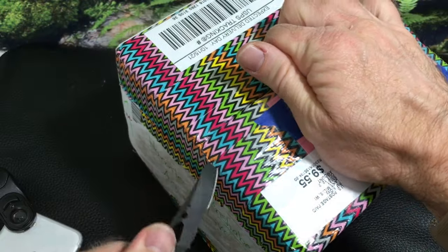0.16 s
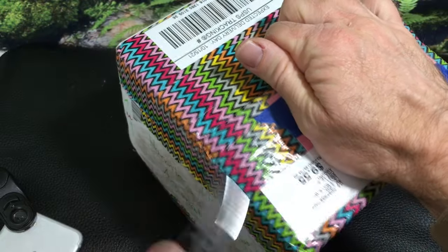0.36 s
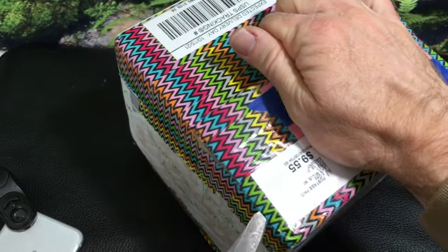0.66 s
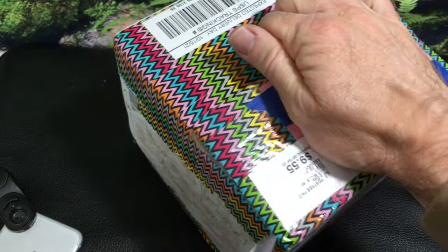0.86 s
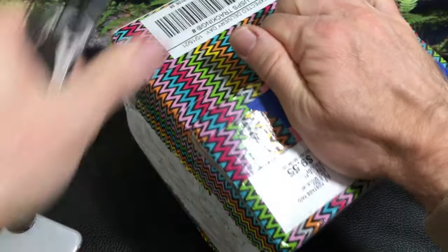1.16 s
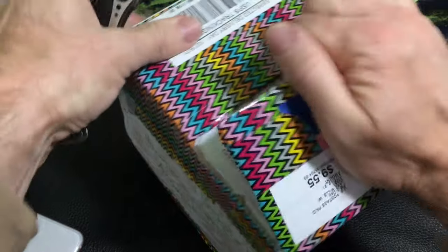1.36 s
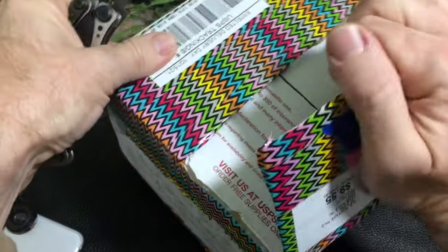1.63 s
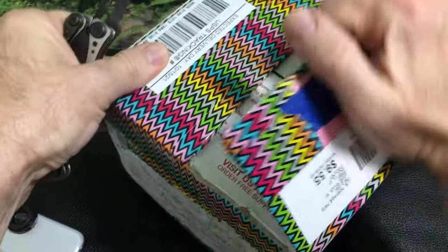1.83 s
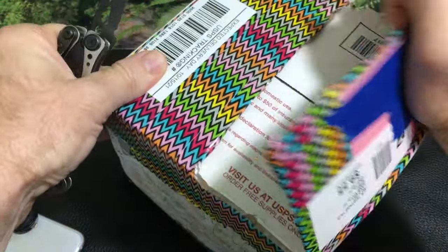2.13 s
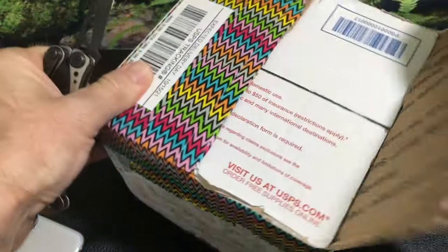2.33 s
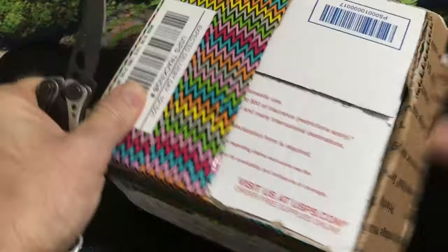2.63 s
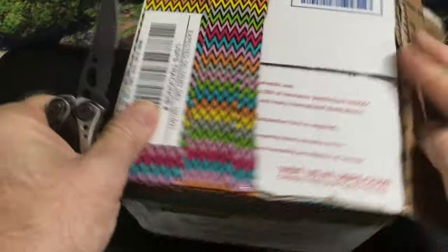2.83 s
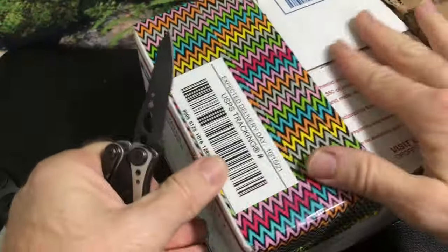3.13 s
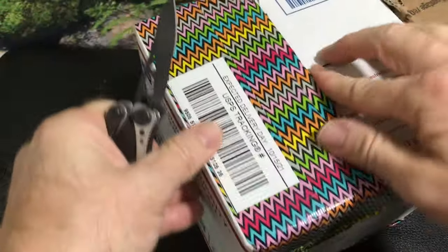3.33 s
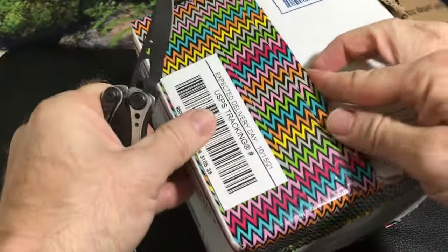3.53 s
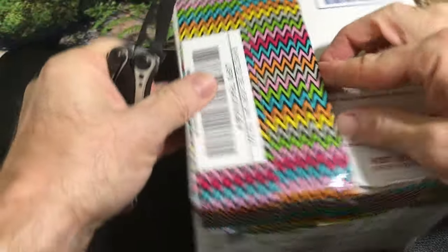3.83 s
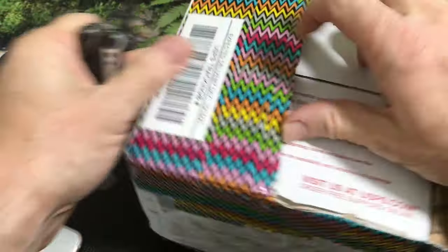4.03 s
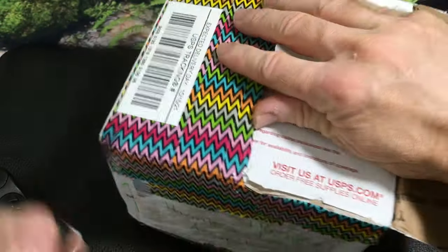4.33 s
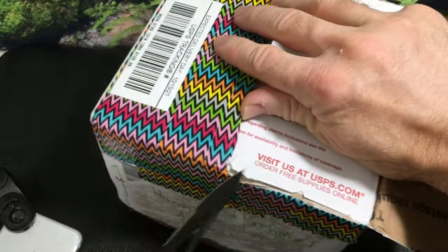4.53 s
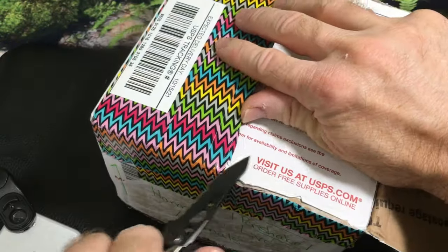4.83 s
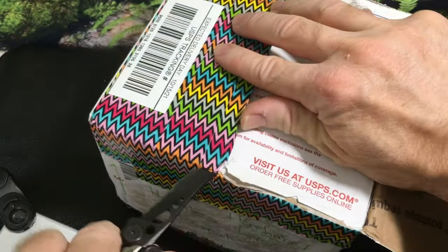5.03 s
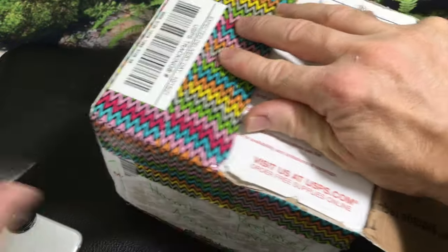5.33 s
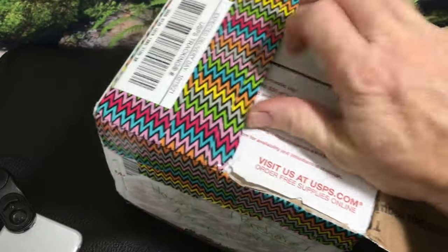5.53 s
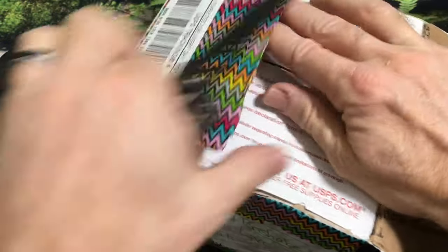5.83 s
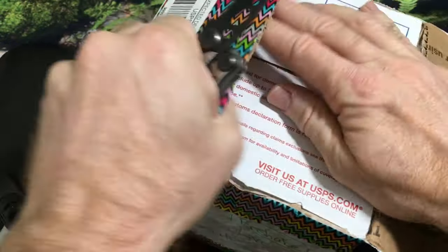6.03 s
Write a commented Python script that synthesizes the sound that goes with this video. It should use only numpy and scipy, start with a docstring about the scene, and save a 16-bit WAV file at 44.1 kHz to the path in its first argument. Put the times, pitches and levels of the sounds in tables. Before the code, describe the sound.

Short gritty cuts and hollow taps come first, ending in sharper hissing slits. After a small pause, tape snaps and peels, then rips hard with crackling and boxy resonance. Palms brush over card, light knocks cluster, a couple of crisp cuts with a strong knock follow, and rubbing closes it. Dry, near microphone, small furnished room, low hum.

```python
"""A small blade is heard first, slitting the thick tape on a cardboard box, close by in a quiet room with a low hum.
The flap is pulled up: the tape peels, snaps thread by thread and rips. Hands slide over the box, turn it and bump it,
and the blade cuts again. Cuts, slides and rips are trains of random tiny slips, filtered into hiss and box drone;
snaps and bumps are decaying noise bursts with a flexing panel that rings the box modes."""
import sys
import numpy as np
from scipy import signal
from scipy.fft import rfft, irfft, next_fast_len
from scipy.io import wavfile
from scipy.ndimage import uniform_filter1d, map_coordinates

SR = 44100
rng = np.random.default_rng(int(sys.argv[2]) if len(sys.argv) > 2 else 0)


def to_wav(s):
    """Save 16-bit WAV."""
    ch = np.atleast_2d(s).T  # columns
    pcm = np.round(np.clip(ch, -1, 1) * 32767)  # PCM
    wavfile.write(sys.argv[1], SR, pcm.astype(np.int16))


N = 272270  # length of the scene [samples]


def amp(db):
    """Level to amplitude: 20 dB is a factor of ten."""
    return 10 ** (np.asarray(db) / 20)


def unit(x):
    """Normalisation by effective value: scale to rms 1."""
    return x / np.sqrt(np.mean(x ** 2) + 1e-20)


def along(points, hz):
    """Logarithmic frequency scale: (frequency [Hz], value) points interpolated along it."""
    f, values = np.transpose(points)
    return np.interp(np.log(hz + 1), np.log(f), values)


def wobble(rate):
    """Slow random modulation: a smooth curve through rate random knots a second."""
    knots = rng.standard_normal(int(N * rate / SR) + 4)
    return map_coordinates(knots, [np.arange(N) * rate / SR])


def colour(x, spectrum):
    """Minimum-phase filtering: the folded cepstrum gives a causal response of this shape; the result has rms 1."""
    m = 2 * next_fast_len(len(x))
    log_gain = np.log(amp(along(spectrum, np.fft.rfftfreq(m, 1 / SR))))
    cepstrum = irfft(log_gain)
    cepstrum[1:m // 2] *= 2
    cepstrum[m // 2 + 1:] = 0
    response = np.exp(rfft(cepstrum))
    return unit(irfft(rfft(x, m) * response)[:len(x)])


def grains(rate, spread_db):
    """Stick-slip friction: tiny slips at random moments, rate a second, of widely varying size."""
    chance, size = rng.random(N), rng.standard_normal(N)
    sign = rng.choice([-1, 1], N)
    return unit((chance < rate / SR) * sign * amp(spread_db * np.clip(size, -2, 2)))


def shifting(x, depth_db):
    """Drifting resonance: the card's fine resonances move as the contact point moves over it."""
    z = signal.stft(x, nperseg=512)[2]
    field = rng.standard_normal(z.shape)
    field = uniform_filter1d(field, size=4, axis=0)  # smooth in frequency
    field = uniform_filter1d(field, size=11, axis=1)  # smooth in time
    return unit(signal.istft(z * amp(depth_db * unit(field)), nperseg=512)[1][:N])


# level reached one attack time before a stroke and one release time after it [dB]
REST_DB = -79


def strokes(rows, attack_s, release_s):
    """Exponential growth and decay: straight dB slopes around a steady swell; a gain for the first and each added layer."""
    t, power = np.arange(N) / SR, 0
    for s, length, db, swell_db, *layers_db in rows:
        held_db = db + swell_db * np.clip((t - s) / length, 0, 1)
        before = np.maximum(s - t, 0) / attack_s
        after = np.maximum(t - s - length, 0) / release_s
        gain = amp(held_db + (REST_DB - held_db) * np.minimum(before + after, 10))
        power = power + np.outer(amp([0, *layers_db]), gain) ** 2  # overlapping strokes add in power
    return np.sqrt(power)


# strokes of the blade: (start [s], length [s], edge hiss level [dB], swell over the stroke [dB],
# rasp relative to hiss [dB], box drone relative to hiss [dB]), before the mix in blade()
CUT_STROKES = [(0.0, 0.026, -58.5, 0, -0.5, 13.5), (0.072, 0.052, -57, 7.5, 0.5, 11),
               (0.145, 0.051, -55.5, -2.5, 2, 12.5), (0.222, 0.087, -54, -4.5, 2, 14),
               (0.354, 0.04, -44, 13, 0.5, 6), (0.566, 0.071, -51.5, 18, -0.5, 9),
               (0.725, 0.032, -40, 1, -5, 2.5), (0.868, .045, -45.5, -6.5, -5, 2.5),
               (0.943, .005, -52, 2, -7, 0), (4.72, 0.02, -44.5, -3, -8.5, -5),
               (4.862, 0.18, -49.5, 0, -4.5, 3.5), (5.041, 0.0086, -39.5, 0, -3.5, 8),
               (5.091, 0.087, -32, 3.5, -6, 3), (5.282, 0.014, -45, 0.5, -4.5, 11),
               (5.331, 0.016, -31, 0.5, -4.5, 5)]
# spectra of the parting tape, the rasping card and the box under the blade: (frequency [Hz], level [dB])
TAPE_HISS_SPECTRUM = [(2000, -20.5), (3600, -5.5), (5200, 1), (7200, -1), (11500, -1.5), (13500, -12.5),
                      (16000, -23)]
CARD_RASP_SPECTRUM = [(600, -21.5), (950, 0.5), (1220, 6.5), (1350, 5), (1480, 2), (2000, -2), (2700, -3),
                      (3600, -3), (5000, -2.5), (8000, -23)]
BLADE_DRONE_SPECTRUM = [(70, -25), (115, -14.5), (190, -18.5), (290, -12.5), (410, -6.5), (480, -0.5),
                        (525, 2), (590, -5.5), (700, -10), (950, -22), (2000, -54)]
CUT_ATTACK_S, CUT_RELEASE_S = 0.03, 0.05  # the edge bites, then runs out


def blade():
    """Fracture noise: the edge parts thousands of fibres a second; tape hisses, card rasps and the box drones."""
    hiss, rasp, drone = strokes(CUT_STROKES, CUT_ATTACK_S, CUT_RELEASE_S)
    fibres = grains(rate=9000, spread_db=3.0) * amp(1.56 * wobble(130))
    tape = hiss * shifting(colour(fibres, TAPE_HISS_SPECTRUM), depth_db=3.5)
    card = amp(1) * rasp * shifting(colour(fibres, CARD_RASP_SPECTRUM), depth_db=2.5)
    box = amp(0.5) * drone * colour(fibres, BLADE_DRONE_SPECTRUM)
    return tape + card + box


# reverberation of the room: (frequency [Hz], decay time to -60 dB [s])
ROOM_DECAY = [(150, 0.34), (600, 0.19), (3000, 0.25), (12000, 0.11)]


def room(x):
    """Reverberation: a small furnished room returns a short noise-like tail, longest in the bass."""
    hz, t, z = signal.stft(rng.standard_normal(SR // 3), SR, nperseg=256)
    decay = amp(-60 * t / along(ROOM_DECAY, hz)[:, None])
    tail = signal.istft(z * decay, SR, nperseg=256)[1]
    delayed = np.pad(x, (round(0.0035 * SR), 0))
    return signal.fftconvolve(delayed, tail / np.linalg.norm(tail))[:N]


# shoves that heave the box and table: (time [s], level [dB])
BOX_SHOVES = [(0.5, -38.5), (1.44, -39), (2.18, -35), (4.35, -43), (5.4, -36)]
SHOVE_FADE_DB_PER_S = 87  # slope on either side of a shove
HELD_DB = -52.5  # the heave of the box merely held


def shoves():
    """Exponential growth and decay: the gain of the slow heave peaks at each shove."""
    t = np.arange(N) / SR
    return amp(HELD_DB) + sum(amp(db - SHOVE_FADE_DB_PER_S * np.abs(t - s)) for s, db in BOX_SHOVES)


# spectrum of the room air: (frequency [Hz], level [dB])
AIR_SPECTRUM = [(15, -44.5), (25, -13.5), (38, -7), (58, -7), (75, -11.5), (95, -22), (150, -32),
                (200, -20), (320, -29.5), (520, -26), (720, -33), (1400, -44), (4000, -45.5), (15000, -54)]


def background():
    """Filtered random noise: steady room air, a low hum, and the slow heave of the handled box."""
    air, hum, heave = rng.standard_normal((3, N))
    air = amp(-49) * colour(air, AIR_SPECTRUM)
    hum = amp(-57) * colour(hum, [(35, -45), (48, -22), (55, 2.5), (62, -8), (80, -29.5), (200, -79.5)])
    heave_spectrum = [(6, -17), (14, 0), (28, -12.5), (50, -20.0), (120, -24), (400, -89.0)]
    heave = shoves() * colour(heave, heave_spectrum)
    return air + hum + heave


def burst(t, t60, tail_db, tail_t60):
    """Two-stage decay: a spatter of random-sign slips dies fast, with a weaker rustle after it."""
    sign = np.sign(rng.standard_normal(len(t)))
    return sign * (amp(-60 * t / t60) + amp(tail_db - 60 * t / tail_t60))


# modes of the box: (frequency [Hz], level [dB], decay time to -60 dB [s]), levels and pitches before random scatter
BOX_MODES = [(108, 3.5, 0.062), (184, -9.5, 0.04), (263.7, -5.5, 0.059), (342.5, -1, 0.044),
             (451, -4, 0.031), (533, -8.5, 0.08), (639, -1, 0.026), (747.4, -5.5, 0.046), (855, -9, 0.041),
             (943, -11, 0.068), (1268, 3, 0.03), (1470, -2.5, 0.03), (1824, -10.5, 0.076),
             (2430, -5, 0.048)]


def box_pop(t, hz, ring_db, reach):
    """Modal excitation: the card flexes out and back once at hz and rings the box modes near that pitch; rms 1."""
    f, db, t60 = np.transpose(BOX_MODES)[:, :, None]
    level, detune = rng.standard_normal((2, len(BOX_MODES), 1))
    octaves_away = np.log2(f / hz)
    weight = amp(db + 2.1 * level) / (1 + (octaves_away / reach) ** 4)  # near modes take the energy
    phase = rng.uniform(0, 2 * np.pi, f.shape)
    modes = weight * np.sin(2 * np.pi * f * (1 + 0.018 * detune) * t + phase) * amp(-60 * t / t60)
    onset = 1 - np.exp(-(t * hz) ** 2 / 2)
    ring = unit(modes.sum(0) * onset)
    u = np.pi * (t * hz - 0.8)
    flex = (1 - 2 * u ** 2) * np.exp(-u ** 2)
    return unit(unit(flex) + amp(ring_db) * ring)


# fingers and blade bumping the box: (time [s], knock level [dB], knock pitch [Hz], thump level [dB],
# scuff level [dB]), before the mix in bumps()
BOX_BUMPS = [(0.107, -23.5, 474, -55, -45.5), (0.381, -14.5, 490, -50, -38), (0.64, -16, 520, -26, -45),
             (1.059, -30.5, 573, -43.5, -63), (1.13, -35.5, 550, -44, -55.5), (1.334, -23, 520, -23, -51),
             (2.516, -36, 580, -30, -36), (2.643, -39, 420, -38.5, -40), (3.104, -35, 700, -44, -50),
             (3.309, -24.5, 694, -43, -43.5), (3.357, -26.5, 685, -40.5, -40.5),
             (3.39, -27.5, 724, -41, -47.5), (3.538, -24.5, 705, -50, -45),
             (3.565, -29.5, 750, -43.5, -50.5), (3.671, -24.5, 680, -36.5, -51),
             (3.84, -21.5, 660, -28, -39.5), (4.001, -23.5, 666, -43, -51), (4.08, -33, 704, -45, -49.5),
             (4.327, -27.5, 570, -42, -47.5), (4.748, -28, 533, -52, -54), (5.098, -12, 517, -38, -41),
             (5.28, -25, 410, -34, -50), (5.591, -23.5, 554, -23, -53), (5.708, -18.5, 446, -31, -44.5)]
# spectrum of scuffed, creased or tearing tape: (frequency [Hz], level [dB])
TAPE_TEAR_SPECTRUM = [(700, -17), (1300, -14), (2100, -2.5), (2700, -4.5), (3500, 1.5), (5000, -5.5),
                      (7500, -4.5), (11000, -6.5), (13500, -18), (16000, -22)]


def bumps():
    """Impact excitation: a nail or the blade scuffs the tape, the panel knocks and the whole box thumps."""
    out, t = np.zeros(N + SR), np.arange(SR // 8) / SR
    for s, db, hz, thump_db, scuff_db in BOX_BUMPS:
        knock = box_pop(t, hz, ring_db=5.0, reach=0.59)
        thump = box_pop(t, hz=254.5, ring_db=2, reach=0.97)
        scuff = colour(burst(t, t60=0.047, tail_db=-7.5, tail_t60=0.093), TAPE_TEAR_SPECTRUM)
        out[round(s * SR):][:len(t)] += amp(scuff_db - 9.5) * scuff
        # knock and thump start 1.5 ms after the scuff
        panel = amp(db - 20.5) * knock + amp(thump_db - 9.5) * thump
        out[round((s + 0.0015) * SR):][:len(t)] += panel
    return out[:N]


def crackle(rate, spread_db, t60, count=3):
    """Impulse response: random tiny snaps from several spots on the stiff tape, each with its own brief ring."""
    t = np.arange(SR // 30) / SR
    rings = rng.standard_normal((count, len(t))) * amp(-60 * t / t60)
    return unit(sum(signal.oaconvolve(grains(rate / count, spread_db), ring)[:N] for ring in rings))


# palms and flaps sliding on card, and tape peeling at 1.385 and 1.57 s: (start [s], length [s],
# hiss level [dB], swell over the stroke [dB], box drone relative to hiss [dB]), before the mix in sliding()
SLIDES_AND_PEELS = [(0.44, .05, -57.5, -2.5, 7), (0.97, 0.45, -67.5, 3.5, 1), (1.295, 0.025, -60, -2, 16),
                    (1.385, .11, -41.5, -0.5, -8), (1.57, 0.078, -49.5, -7, 8.5),
                    (1.75, 0.091, -46.5, 1, 3), (1.865, 0.073, -41, -7, -3), (1.99, 0.1, -57.5, -0.5, 9.5),
                    (2.28, .14, -57.5, 2, 4.5), (2.45, .19, -50, 6.5, 3), (2.67, .39, -44.5, -0.5, 0),
                    (3.12, 0.042, -59.5, 0, -1), (3.2, 0.011, -46.5, 0.5, -6), (3.24, 0.37, -56.5, -4, 7.5),
                    (3.675, 0.339, -53.5, 4, 7), (4.04, 0.4, -54.5, -6, 7), (4.835, .03, -59, 3, 0),
                    (5.39, 0.18, -63, 3, 3), (5.675, 0.039, -50, 2, 2), (5.785, 0.035, -49, 0.5, 4.5),
                    (5.855, 0.036, -51, -1.5, 0.5), (5.93, 0.25, -48, -6, 1)]
# spectra of the rubbing hiss and of the card panel under it: (frequency [Hz], level [dB])
RUB_SPECTRUM = [(700, -35), (1200, -5), (1650, 0), (2100, -7.5), (2700, -5.5), (3500, -5), (5000, -1),
                (7000, -2.5), (11000, -1.5), (13500, -9), (16000, -21)]
CARD_PANEL_SPECTRUM = [(70, -19.5), (130, -7.5), (220, -9.5), (350, -1.5), (520, 0.5), (680, -6),
                       (850, -6.5), (1200, -12.5), (1800, -13.5), (3500, -52)]
SLIDE_ATTACK_S, SLIDE_RELEASE_S = 0.064, 0.076  # gentler than the blade at both ends


def sliding():
    """Sliding friction: skin and card rub with a fine, uneven grain, tape crinkles faintly; peeling tape hisses alike."""
    hiss, drone = strokes(SLIDES_AND_PEELS, SLIDE_ATTACK_S, SLIDE_RELEASE_S)
    pressure = amp(1.4 * wobble(45))
    rub = grains(rate=9000, spread_db=2) * pressure
    surface = shifting(colour(rub, RUB_SPECTRUM), depth_db=3.5)
    creases = colour(crackle(rate=130, spread_db=4.5, t60=0.006), TAPE_TEAR_SPECTRUM)
    box = amp(0.5) * drone * colour(rub, CARD_PANEL_SPECTRUM)
    return hiss * (surface + amp(-11.5) * creases) + box


# tape threads snapping: (time [s], crack level [dB], fizz level [dB], pop level [dB]), before the mix in snaps()
THREAD_SNAPS = [(0.6402, -19, -24, -12.5), (0.9176, -45, -37, -33.5), (1.3348, -19.5, -33, -19),
                (1.3767, -20.5, -24, -29.5), (1.4227, -16, -24, -27), (1.4715, -28, -35, -31),
                (1.4799, -17, -24.5, -24.5), (1.5062, -22, -35.5, -30), (1.5253, -27, -34, -34),
                (1.544, -2, -20, -11.5), (1.551, -21, -29, -23), (1.5608, -23, -29.5, -26.5),
                (1.6293, -28, -40.5, -34), (1.6797, -29.5, -41, -37), (1.9976, -30, -40, -38.5),
                (2.047, -30, -28.5, -27.5), (2.0605, -23, -36, -34), (2.0764, -35.5, -41, -37),
                (2.0945, -26, -31, -42), (2.0985, -22, -34.5, -42), (2.134, -28, -29.5, -32),
                (2.161, -14, -23, -27), (2.183, -11, -35, -36), (2.19, -11, -33, -31),
                (2.2276, -12, -43, -28), (2.2605, -19, -41, -25.5), (2.341, -17.5, -37, -25),
                (2.353, -20, -32, -34), (2.5169, -28, -30.5, -26), (2.6455, -30, -27.5, -29),
                (5.3462, -14.5, -40, -27.5), (5.8096, -29, -35, -36.5)]
# spectrum of a breaking thread: (frequency [Hz], level [dB])
THREAD_CRACK_SPECTRUM = [(700, -39.5), (1300, 1), (2000, -5.5), (2700, -4.5), (3500, -0.5), (5000, -6),
                         (7500, -19), (11000, -20.5), (16000, -33)]
POP_HZ, POP_REF_DB, POP_OCTAVES_PER_DB = 515, -31, 0.04  # a harder pop flexes the card faster


def snaps():
    """Sudden release of tension: a thread breaks with a crack and a fizz of glue, and the stretched card pops back."""
    out, t = np.zeros(N + SR), np.arange(SR // 8) / SR
    for s, db, fizz_db, pop_db in THREAD_SNAPS:
        hz = POP_HZ * 2 ** (POP_OCTAVES_PER_DB * (pop_db - POP_REF_DB))
        crack = colour(burst(t, t60=0.004, tail_db=-10.5, tail_t60=0.04), THREAD_CRACK_SPECTRUM)
        fizz = colour(burst(t, t60=0.0024, tail_db=-10.0, tail_t60=0.03), TAPE_HISS_SPECTRUM)
        pop = box_pop(t, hz, ring_db=-4, reach=1.4)
        snap = amp(db - 28) * crack + amp(fizz_db - 15.0) * fizz + amp(pop_db - 14) * pop
        out[round((s + 0.001) * SR):][:len(t)] += snap
    return out[:N]


# pulls on the tape, a short peel and the long rip: (start [s], length [s], crackle level [dB],
# swell over the pull [dB], box drone relative to crackle [dB]), before the mix in rip()
TAPE_PULLS = [(1.47, 0.095, -38.5, 1.5, -2), (2.092, .105, -40, 25, 6)]
RIP_ATTACK_S, RIP_RELEASE_S = 0.025, 0.155  # the tape catches, then runs free
RIP_BOX_LIMIT_DB = -23.5  # ceiling on the drone gain of the stretched card, before the mix


def rip():
    """Progressive fracture: the tape lets go in a run of tiny snaps, joined by random kicks to the box."""
    tear, pull = strokes(TAPE_PULLS, RIP_ATTACK_S, RIP_RELEASE_S)
    drone = pull / np.hypot(1, pull / amp(RIP_BOX_LIMIT_DB))
    threads = crackle(rate=850, spread_db=3, t60=0.005)
    kicks = grains(rate=1000, spread_db=1.0)
    tape = amp(-6.0) * tear * colour(threads, TAPE_TEAR_SPECTRUM)
    box = amp(-3.5) * drone * colour(kicks, CARD_PANEL_SPECTRUM)
    return tape + box


def scene():
    """Superposition: all the work on the box, its reverberation and the background add."""
    work = blade() + sliding() + rip() + snaps() + bumps()
    return (work + amp(-17) * room(work) + background())[None]


TOP_HZ = 16000  # upper band limit


def record(dry):
    """Saturation and band limiting: the loudest peaks are rounded off and nothing above the limit is kept."""
    m = next_fast_len(N + SR // 2)
    rounded = dry / (1 + np.abs(dry / 0.9) ** 6) ** (1 / 6)
    passband = np.fft.rfftfreq(m, 1 / SR) < TOP_HZ
    return irfft(rfft(rounded, m) * passband, m)[..., :N]


dry = scene()
out = record(dry)
to_wav(out)
```